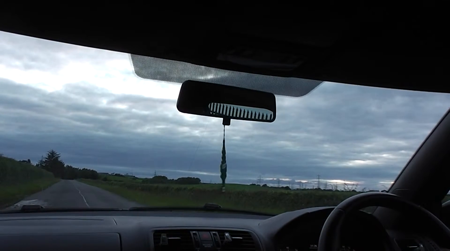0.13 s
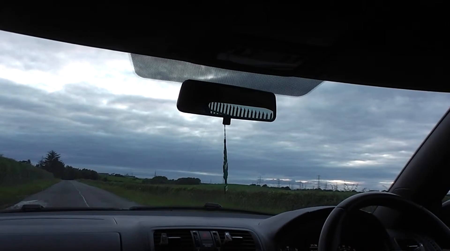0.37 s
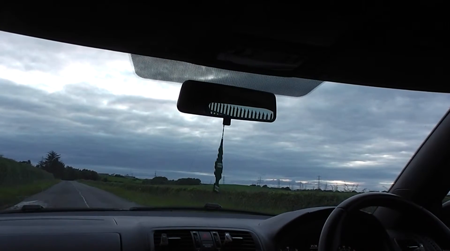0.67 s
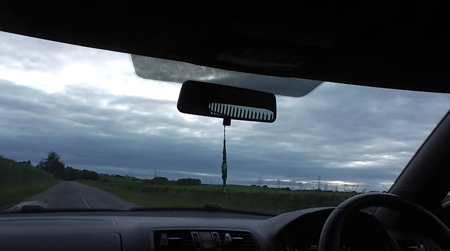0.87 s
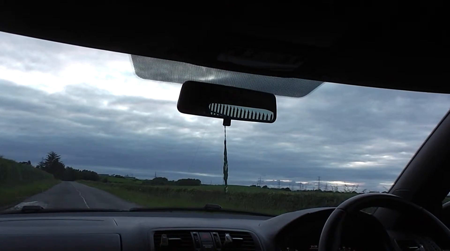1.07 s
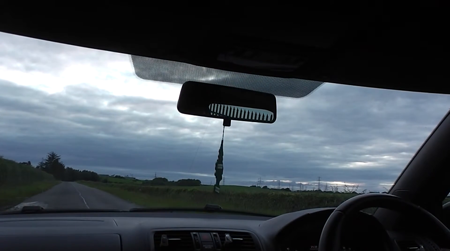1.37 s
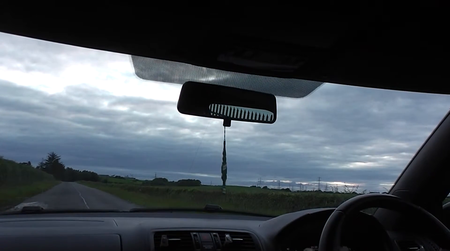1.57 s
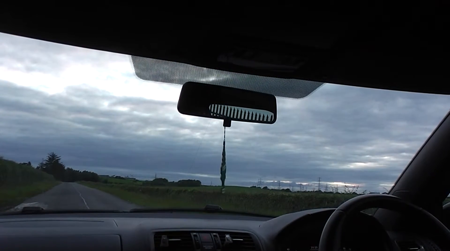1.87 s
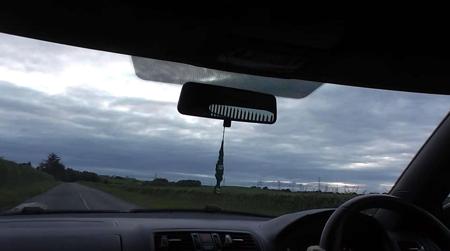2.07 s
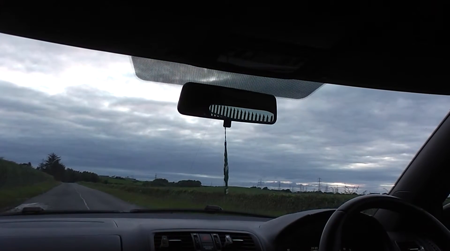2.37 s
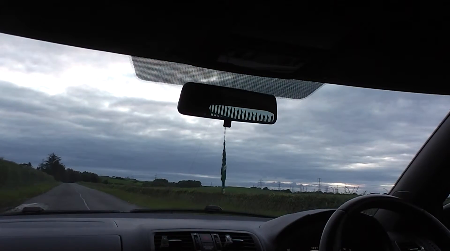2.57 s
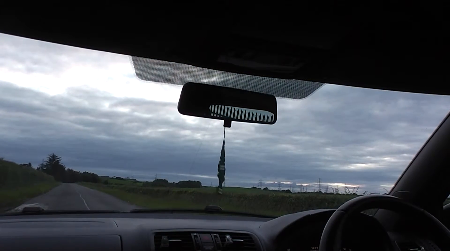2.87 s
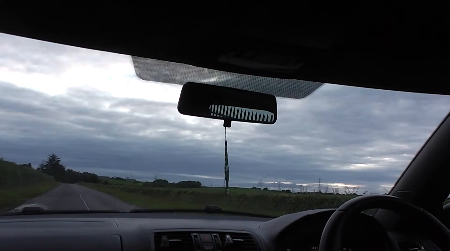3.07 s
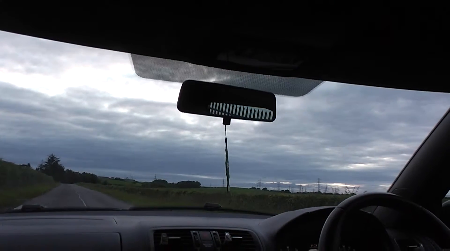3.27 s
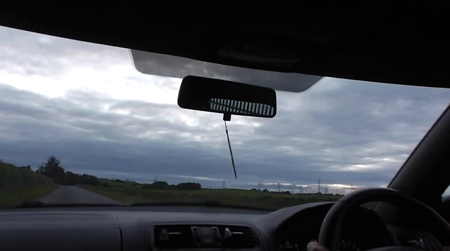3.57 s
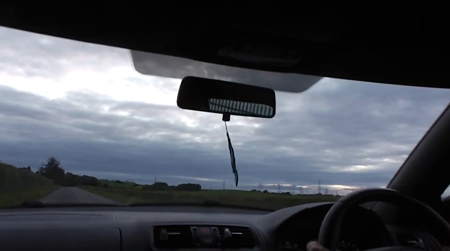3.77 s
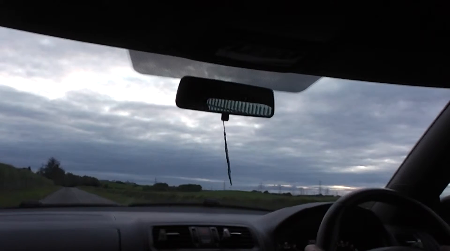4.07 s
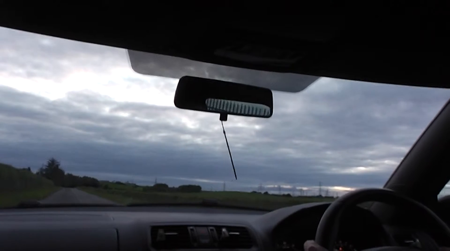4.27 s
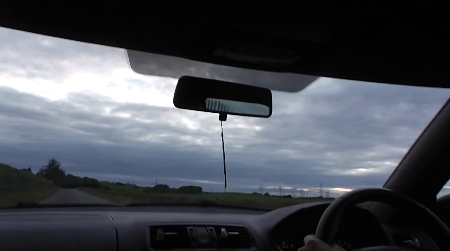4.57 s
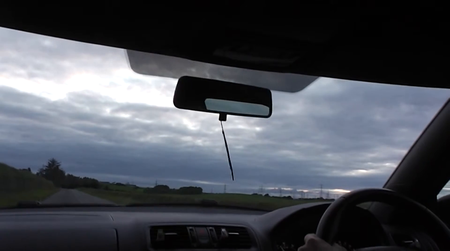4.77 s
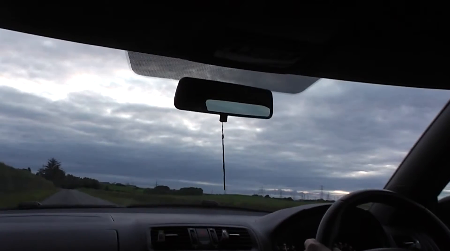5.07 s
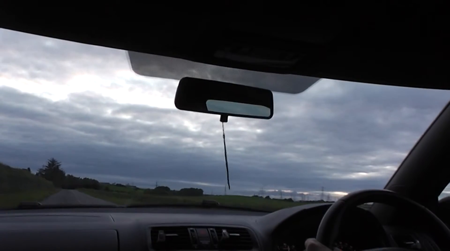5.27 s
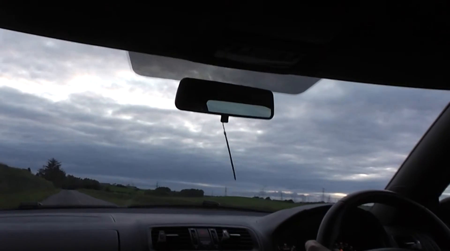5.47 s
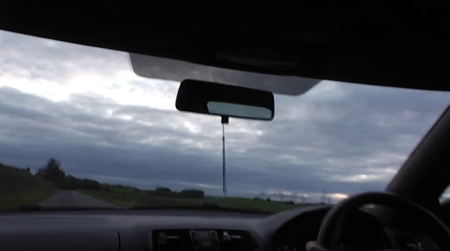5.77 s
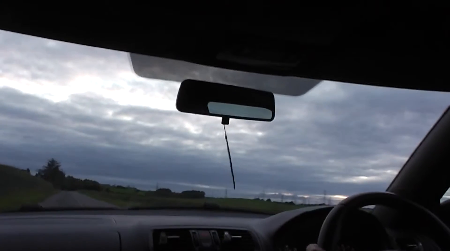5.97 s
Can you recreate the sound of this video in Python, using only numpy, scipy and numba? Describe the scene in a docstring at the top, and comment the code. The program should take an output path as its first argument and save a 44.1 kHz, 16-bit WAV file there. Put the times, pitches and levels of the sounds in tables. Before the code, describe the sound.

Inside a car cabin, an engine idles quietly, a gear lever knocks, then the car launches hard with tyre scrub, squeals and roaring revs.

```python
"""Inside a car, a four-cylinder engine idles as wavering tones over a bed of noise; the lever knocks home.
A faint rustle passes, then more knocks follow: short shoves that ring the modes of the body.
The car launches hard: the revs climb, scrubbing tyres make bursts of grains, gritty scrapes and shaky squeals.
Filtered noise grows into road roar, loose trim ticks and chatters, and near the end the pitch drops at a shift.
"""
import sys
import numpy as np
from scipy import signal
from scipy.fft import rfft, irfft, next_fast_len
from scipy.io import wavfile
from scipy.ndimage import uniform_filter1d
from numba import njit

SR = 44100
rng = np.random.default_rng(int(sys.argv[2]) if len(sys.argv) > 2 else 0)


def wav_record(signal):
    """Record a signal, one row per channel, as 16-bit PCM in the file named by sys.argv[1]."""
    frames = np.transpose(np.atleast_2d(signal))
    bounded = np.clip(frames, -1, 1)
    # unit amplitude maps onto the largest positive 16-bit level
    quanta = np.round(bounded * 32767).astype(np.int16)
    wavfile.write(sys.argv[1], SR, quanta)


N = 270774  # length in samples

# The engine's course: start_s, firing_rate_hz, firing_tone_db, load_db
ENGINE_COURSE = [(0.0, 38.27, -38, -37), (.5, 37.55, -36, -42.5), (1.2, 36.3, -32.5, -44.5),
                 (2.401, 36.57, -33.5, -44), (2.96, 40.25, -30.5, -38), (3.38, 51.16, -34.5, -36),
                 (3.54, 56.83, -23.5, -32), (3.73, 61.55, -17, -15), (3.9, 67.08, -26.5, -34),
                 (4.161, 86.73, -20.5, -22.5), (4.33, 101.9, -12.5, -16.5), (4.55, 110.8, -16, -18.5),
                 (4.74, 124.2, -9.5, -15.5), (5.03, 144.8, -18.5, -13), (5.161, 153.4, -6.5, -13),
                 (5.4, 173.8, -13, -10.5), (5.52, 183, -8.5, -12), (5.86, 206, -6.5, -11.5),
                 (5.97, 173.8, -9, -18.5), (6.07, 146.2, -14, -14.5), (6.14, 152, -10.5, -16)]

PORT_LAG = 2  # samples between the two microphone ports for sound from one side


def engine():
    """Crank orders are wavering tones tied to the firing rate; cabin modes lift those that sweep through."""
    # Cabin resonances: pitch_hz, width_hz, level_db
    cabin_modes = [(110, 35, -15.5), (187, 22, 2.5), (259.5, 54, 4), (316, 110, -4.5), (503, 49, 2.5),
                   (605, 32.3, 8), (872, 74, -11.5), (1182, 44, -13)]
    # How the body passes the 2nd and 3rd firing multiples: pitch_hz, level_above_load_db
    overtone_response = [(74, -13.5), (100, 13), (110, 2), (120, -9), (160, -5.5), (205, -16.5), (255, 0.5),
                         (310, -5.5), (372, -18), (430, -17), (505, -9), (548, -15.5), (608, -0.5),
                         (640, -29)]
    coarse = 8  # the tones are drawn at 1/8 of the sample rate
    quarter_db, half_db = -8.5, -5.5  # uneven cylinders: orders between the firing multiples
    orders_below_load_db = -14
    hum_idle_db, in_gear_s, in_gear_change_db = -39, 2.56, -9

    (hz, tone_db, load_db), _ = curves(ENGINE_COURSE)
    phase = (np.cumsum(hz) / SR)[::coarse]  # in firings

    def tone(multiple, waver_db):
        level = undb(waver_db * walk(14 * coarse, size=len(phase)))  # 14 new levels a second
        return np.sqrt(2) * level * np.sin(2 * np.pi * (multiple * phase + rng.random()))

    def fine(x):
        return signal.resample_poly(x, coarse, 1)[:N]

    firing = undb(tone_db) * fine(tone(1, 1.3))
    body_hz, body_db = np.transpose(overtone_response)
    for multiple in (2, 3):
        passed_db = np.interp(np.log(multiple * hz), np.log(body_hz), body_db)
        firing = firing + undb(load_db + passed_db) * fine(tone(multiple, 1.3))

    # A cycle holds four firings, so the orders lie a quarter of the firing rate apart.
    orders = 0
    for quarter in range(2, 48):
        if quarter in (4, 8, 12):  # the firing tone and its two overtones are made above
            continue
        order_db = (0, quarter_db, half_db, quarter_db)[quarter % 4]
        orders = orders + undb(order_db) * tone(quarter / 4, 2.0)
    orders = resonate(fine(orders), cabin_modes) * undb(load_db + orders_below_load_db)

    # The 7th firing multiple hums, and drops once in gear.
    since_gear = np.arange(N) / SR - in_gear_s
    hum_db = hum_idle_db + np.interp(since_gear, (0, 0.1), (0, in_gear_change_db))
    hum = undb(hum_db) * fine(tone(7, 0.4))
    return firing + hum + orders


def scrub():
    """Spinning tyres scrub in bursts: tread blocks slip in dense uneven grains, and grit sprays above."""
    # Bursts: full_at_s, rise_s, hold_s, level_db, grit_db (as it stands at full_at_s)
    bursts = [(3.308, .04, 0.053, -34, -75), (3.348, 0.0059, 0.0028, -37, -39.5),
              (3.42, 0.032, 0.0026, -37, -45), (3.494, 0.023, 0.047, -31.5, -60),
              (3.622, 0.18, 0.24, -13, -32.5), (3.925, 0.029, 0.0023, -17, -28),
              (3.968, 0.013, 0.0017, -14.5, -49)]
    # Tread resonances: pitch_hz, width_hz, level_db
    tread_modes = [(479.6, 28, 8.5), (716, 157, 0.5), (992, 208, -1), (1615, 354, -12), (2250, 310, -20)]
    # Colour of the grit: pitch_hz, relative_level_db
    grit_colour = [(1200, -3), (2200, 0.5), (4100, -8.5), (6500, -7), (11000, -23.5), (12500, -39),
                   (15600, -54)]
    fall_s, range_db = 0.065, 41  # each rise_s or fall_s spans this range
    grit_growth = 30  # dB per second, from the rise through the hold

    t = np.arange(N) / SR
    grip = undb(3.8 * walk(150))

    def slips(depth):
        return rng.standard_normal(N) * grip ** depth

    tread = wide(lambda: unit(resonate(slips(0.8), tread_modes)))
    grit = wide(lambda: unit(colour(slips(0.35), grit_colour)))
    grit = grit * undb([[1.2], [-1.2]])  # stronger on the left
    tread_gain = grit_gain = 0
    for s, rise, hold, db, grit_db in bursts:
        burst = swell(s, rise, hold, fall_s, range_db)
        growth_db = grit_growth * np.clip(t - s, -rise, hold)
        tread_gain = tread_gain + undb(db) * burst
        grit_gain = grit_gain + undb(grit_db + growth_db) * burst
    return tread_gain * tread + grit_gain * grit


def squeal():
    """Tread sticks and slips: two tyres chirp on shaky pitches, each with a weak octave."""
    # Chirps: start_s, length_s, from_hz, to_hz, level_db
    chirps = [(3.56, 0.16, 870, 990, -16.5), (3.95, 0.16, 1120, 1073, -25), (4.095, 0.096, 1160, 1145, -20),
              (4.19, 0.063, 1158, 1127, -15), (4.24, 0.059, 1137, 1168, -11.5),
              (4.3, 0.16, 1160, 1180, -24), (4.45, 0.094, 1165, 1147, -30.5)]
    edge_s = 0.024  # fade at each end of a chirp
    t = np.arange(N) / SR
    times, pitches, gain = [], [], 0
    for s, length, from_hz, to_hz, db in chirps:
        times += [s, s + length]
        pitches += [from_hz, to_hz]
        gain = gain + undb(db) * np.clip(np.minimum(t - s, s + length - t) / edge_s, 0, 1)
    hz = np.interp(t, times, pitches)

    def tyre():
        shake = 1 + 0.006 * walk(40) + 0.027 * walk(320)
        phase = 2 * np.pi * np.cumsum(hz * shake) / SR
        return undb(3.2 * walk(100)) * (np.sin(phase) + undb(-33) * np.sin(2 * phase))

    # One tyre is alike in both ports; the weaker one has opposite signs in them.
    mid, side = tyre(), undb(-7.5) * tyre()
    return gain * np.array([mid + side, mid - side])


def knocks():
    """Lever and driveline blows are short rough shoves that ring the body; bright ones favour its high modes."""
    # Blows: start_s, level_db, brightness_db_per_octave
    blows = [(0.153, -26, -3), (0.2, -38.5, 3.5), (0.261, -37, -1), (2.443, -28, -0.5), (2.478, -33, 2),
             (2.516, -23, -0.5), (2.571, -21, -0.5), (2.596, -26.5, 1), (2.701, -23, 3), (3.218, -29.5, 1),
             (3.835, -13.5, 7.5), (3.933, -32, -10), (3.964, -32, -7)]
    # Body modes: pitch_hz, level_db, t60_s (time to fall by 60 dB)
    body_modes = [(128, -1.5, 0.22), (179, 2, 0.078), (267, 4.5, 0.03), (352, -5, 0.082), (477, 3, 0.012),
                  (634, 6.5, 0.01), (1030, -11.5, 0.016), (1285, -5.5, 0.0093), (2380, 0, 0.0031)]
    out = np.zeros(N)
    for s, db, tilt_db in blows:
        modes = 0
        for hz, mode_db, t60 in body_modes:
            gain = undb(mode_db + tilt_db * np.log2(hz / 200))
            detuned_hz = hz * (1 + 0.04 * rng.standard_normal())
            modes = modes + gain * ring(detuned_hz, t60, attack=0.00099, size=5000)
        shove = rng.standard_normal(1200) * np.exp(-np.arange(1200) / SR / 0.009)
        shove = shove / np.sqrt(np.sum(shove ** 2))
        add(out, s, undb(db) * np.convolve(modes, shove))
    return out


def ticks():
    """Loose trim is struck and chatters; the touches near 3.35, 3.43 and 3.93 s are gritty tyre scrapes."""
    # Touches of the trim and the three scrapes: start_s, level_db
    touches = [(2.2821, -34.5), (2.6085, -38), (2.7002, -30.5), (3.3522, -24.5), (3.427, -34.5),
               (3.8396, -12.5), (3.928, -41), (4.002, -33), (4.0446, -31.5), (4.092, -30.5), (4.1628, -27),
               (4.2552, -29.5), (4.402, -28.5), (4.5092, -24.5), (4.5886, -25), (4.6907, -28),
               (4.7245, -30), (4.8403, -32), (5.1421, -31), (5.216, -37), (5.3455, -31.5), (5.5318, -26.5),
               (5.543, -30), (5.638, -35), (5.6574, -29.5), (5.7293, -31), (5.7481, -27.5), (5.76, -26),
               (5.8984, -34), (5.948, -30), (6.0805, -16.5)]
    out = np.zeros((2, N))
    s_engine, firing_hz = np.transpose(ENGINE_COURSE)[:2]
    # Faint ticks fall at random from 4 to 6.1 s, at -48 to -40 dB.
    faint = [(4 + 2.1 * u, -48 + 8 * v) for u, v in rng.random((34, 2))]
    for s, db in list(touches) + faint:
        # Repeats come once per firing, or every 6 ms if that is shorter.
        period = min(1 / np.interp(s, s_engine, firing_hz), 0.006)
        for bounce in range(-1, 4):  # -1 is a weaker touch ahead of the main one
            lag = bounce * period * (1 + 0.03 * rng.standard_normal())
            loss_db = abs(bounce) * (2.5 + 6 * rng.random()) + 9 * (bounce < 0)
            add(out, s + lag, undb(db - loss_db) * from_left(contact))
    return out


def contact():
    """One touch, of the trim or in a scrape: a broad noise snap and short ringing modes."""
    # Ringing modes: pitch_hz, level_db, t60_s (time to fall by 60 dB)
    contact_modes = [(4180, -13, 0.0058), (6198, -10.5, 0.021), (6920, -6, 0.009), (8400, -3.5, 0.0069),
                     (9700, -2, 0.015), (10900, -1.5, 0.0094), (14180, -13.5, .005)]
    snap = rng.standard_normal(600) * np.exp(-np.arange(600) / SR / 0.0008)
    touch = undb(-7) * snap
    for hz, db, t60 in contact_modes:
        detuned_hz = hz * (1 + 0.043 * rng.standard_normal())
        touch = touch + undb(db) * ring(detuned_hz, t60, attack=0.00015, size=600)
    return touch


def road():
    """Noise through the body: a steady idle bed, then wavering rumble, roar and hiss that grow with speed."""
    # Road noise: start_s, rumble_db
    road_course = [(2.9, -46.5), (3.4, -27), (3.8, -25), (4.3, -13), (4.7, -16.5), (6.3, -14.5)]
    # Noise colours, each: pitch_hz, relative_level_db
    rumble_colour = [(11, -33), (18, -9), (108, 2.5), (194, -4), (243, -3), (291, -6.5), (412, -8.5),
                     (500, -11.5), (650, -36.5), (1100, -120)]
    roar_colour = [(150, -44), (250, 4), (410, -38.5), (606, -9), (921, -24), (1150, -22.5), (1300, -27.5),
                   (1630, -28.5), (2790, -52), (9000, -75), (11700, -93), (19800, -120)]
    hiss_colour = [(1500, -2.5), (3000, 10), (6000, 4.5), (9000, -4.5), (15600, -9)]
    idle_colour = [(11, -31.5), (18, -6), (49, -14.5), (80, -18), (120, -17), (158, -11.5), (207, -23.5),
                   (259, -7.5), (325, -22), (511, -15.5), (1030, -34.5), (4000, -58), (5200, -101.5),
                   (8800, -120)]
    roar_db, hiss_db, idle_db = -7.5, -41, -42  # roar and hiss are against the rumble

    def noise(shape, waver_db):
        return wide(lambda: unit(colour(rng.standard_normal(N), shape)) * undb(waver_db * walk(15)))

    (road_db,), gate = curves(road_course)
    moving = noise(rumble_colour, 2.43)
    moving = moving + undb(roar_db) * noise(roar_colour, 2.43)
    moving = moving + undb(hiss_db) * noise(hiss_colour, 2.43)
    return gate * undb(road_db) * moving + undb(idle_db) * noise(idle_colour, 0.39)


def rustle():
    """A faint rustle: noise of uneven grain through one broad resonance."""
    # Swells: loudest_at_s, rise_s, fall_s, level_db
    swells = [(1.38, 0.032, 0.092, -61), (1.62, .06, 0.066, -59.5), (1.68, 0.069, .12, -59.5)]

    def grains():
        uneven = rng.standard_normal(N) * undb(3.2 * walk(160))
        return unit(resonate(uneven, [(6360, 6100, 0)]))

    gain = sum(undb(db) * swell(s, rise, 0, fall, 16.6) for s, rise, fall, db in swells)
    return gain * wide(grains)


def undb(db):
    """Turns decibels into gain."""
    return np.exp(np.asarray(db) * (np.log(10) / 20))


def unit(x):
    """Scales to an rms of 1."""
    return x / np.sqrt(np.mean(x ** 2))


def curves(table):
    """Draws table columns as signals, with a gate that is closed outside the table's time span."""
    s, *columns = np.transpose(table)
    t = np.arange(N) / SR
    gate = np.clip(np.minimum(t - s[0], s[-1] - t) / 0.046, 0, 1)
    return [np.interp(t, s, column) for column in columns], gate


def colour(x, points):
    """Filters x by a gain curve through the (Hz, dB) points."""
    point_hz, db = np.transpose(points)
    size = next_fast_len(N)
    hz = np.arange(size // 2 + 1) * SR / size
    gain = undb(np.interp(np.log(hz + 1), np.log(point_hz), db))  # the 1 avoids log(0)
    return irfft(rfft(x, size) * gain, size)[..., :N]


def walk(rate, size=N):
    """Smooth random wander: held random levels, rate a second, averaged twice; spread near 1."""
    k = int(SR / rate)
    held = np.repeat(rng.standard_normal(size // k + 1), k)
    return 1.3 * uniform_filter1d(uniform_filter1d(held, k), k)[:size]


def resonate(x, modes):
    """Sums resonances (Hz, width Hz, dB) driven by x, with alternating sign."""
    out = 0
    for k, (hz, width, db) in enumerate(modes):
        b, a = signal.iirpeak(hz, hz / width, fs=SR)
        out = out + (-1) ** k * undb(db) * signal.lfilter(b, a, x)
    return out


def ring(hz, t60, attack, size):
    """One dying mode with a random phase; a softer contact (longer attack) builds it up more slowly."""
    t = np.arange(size) / SR
    decay = np.exp(-np.log(1000) * t / t60)
    return np.sin(2 * np.pi * (hz * t + rng.random())) * decay * (1 - np.exp(-t / attack)) ** 2


def swell(s, rise, hold, fall, range_db):
    """Gain climbs by range_db per rise to full at s, holds, falls likewise; silent past twice the range."""
    t = np.arange(N) / SR
    away = np.maximum(np.maximum((s - t) / rise, (t - s - hold) / fall), 0)
    return undb(-range_db * away) * (away < 2)


def add(out, s, x):
    """Mixes x into out from time s."""
    i = int(s * SR)
    out[..., i:i + x.shape[-1]] += x[..., :N - i]


def wide(make):
    """Two unrelated renderings as mid and side: alike in the bass, loose in the treble."""
    # Stereo width: pitch_hz, side_minus_mid_db
    side_levels = [(60, -23), (200, -20.5), (700, -13), (1300, -6), (4400, -4.5), (15000, -3)]
    mid, side = make(), colour(make(), side_levels)
    return np.array([mid + side, mid - side])


def from_left(make, loose_db=-12, pan_db=1.9):
    """Sound from the left reaches the right port later and weaker, with some unrelated scatter."""
    x = make()
    return np.array([undb(pan_db) * x, np.roll(x, PORT_LAG) + undb(loose_db) * make()])


def scene():
    """Everything heard at the dashboard; the engine reaches the left port first."""
    motor = np.pad(engine(), (0, PORT_LAG), mode="edge")
    cabin = np.array([motor[PORT_LAG:], motor[:N]])
    cabin = cabin + scrub() + squeal() + knocks() + ticks() + road() + rustle()
    return cabin * undb([[0.18], [-0.18]])  # the left port is a little more exposed


@njit
def limiter(x, top, duck, fast, slow):
    """Gain that starts down the moment the level passes the top, then creeps back."""
    gain, g, aim = np.empty(len(x)), 1., 1.
    for i in range(len(x)):
        if g * x[i] > top:
            aim = duck * g
        aim += (1 - aim) * slow
        g += (aim - g) * fast
        gain[i] = g
    return gain


def record(dry):
    """The microphone overloads softly and adds hiss; an abrupt limiter and a cut of the top follow."""
    # Colour of the microphone hiss: pitch_hz, relative_level_db
    mic_colour = [(1180, -20), (2000, 2.5), (2800, -22), (4520, -6), (15600, -10)]
    hiss_db, top_hz, limit = -62, 15700, 0.94
    duck, duck_s, recover_s = 0.82, 0.0001, 0.03  # share of gain aimed for after a peak; time constants

    hiss = undb(hiss_db) * unit(colour(rng.standard_normal((2, N)), mic_colour))
    heard = np.tanh(0.4 * dry) / 0.4 + hiss
    loudest = np.abs(heard).max(axis=0)  # both ports share one gain
    gain = limiter(loudest, limit, duck, 1 / (duck_s * SR), 1 / (recover_s * SR))
    held = np.clip(heard * gain, -1, 1)
    low_pass = signal.ellip(10, 0.2, 80, top_hz, fs=SR, output="sos")
    return signal.sosfilt(low_pass, held)


dry = scene()
out = record(dry)
wav_record(out)
```